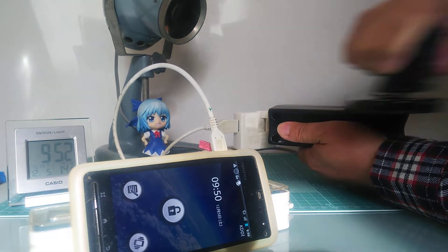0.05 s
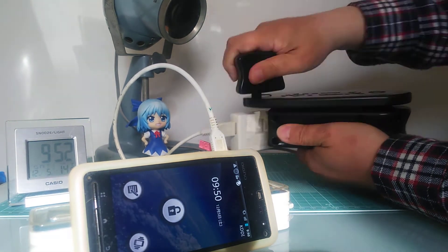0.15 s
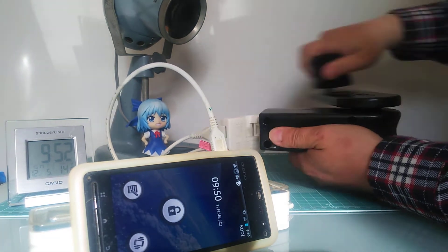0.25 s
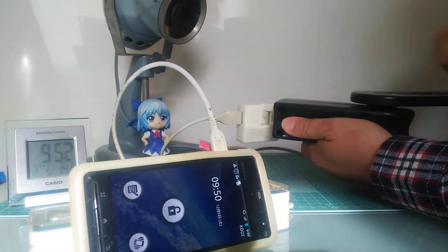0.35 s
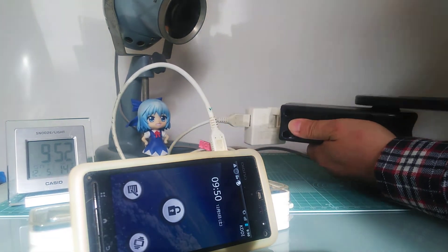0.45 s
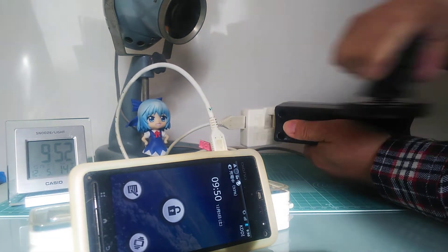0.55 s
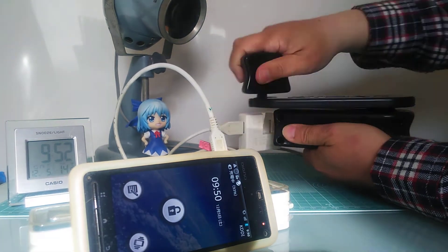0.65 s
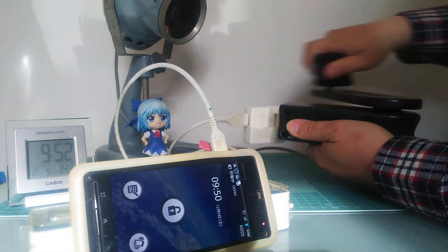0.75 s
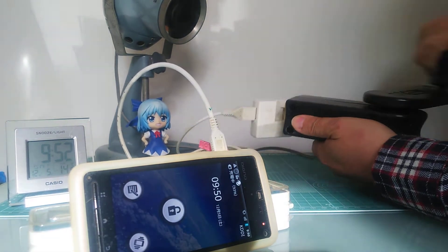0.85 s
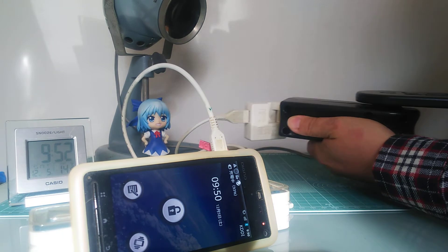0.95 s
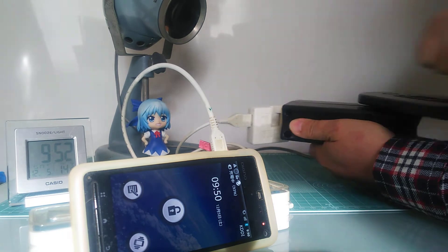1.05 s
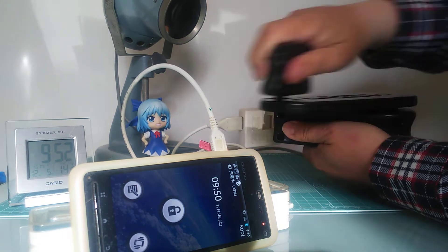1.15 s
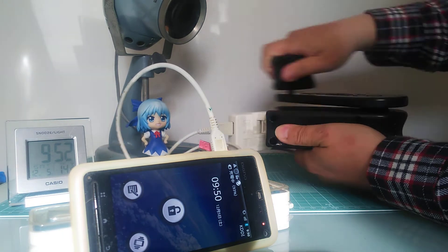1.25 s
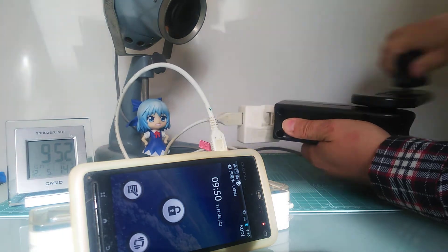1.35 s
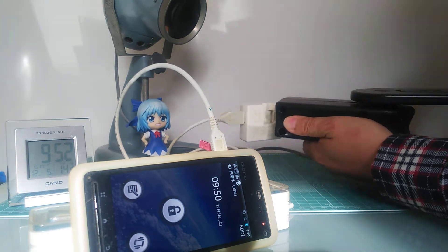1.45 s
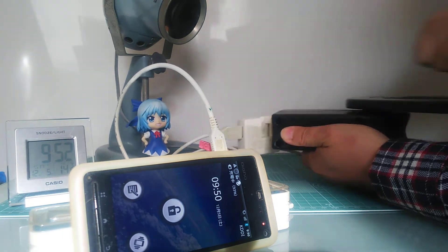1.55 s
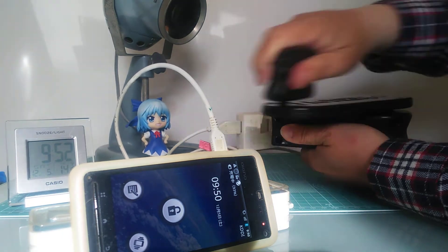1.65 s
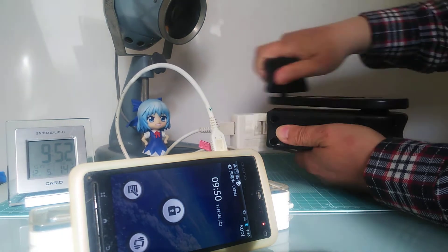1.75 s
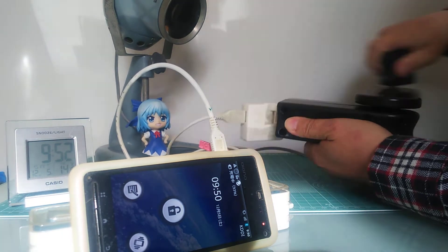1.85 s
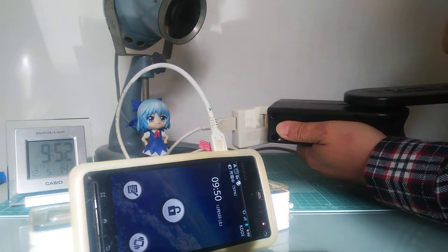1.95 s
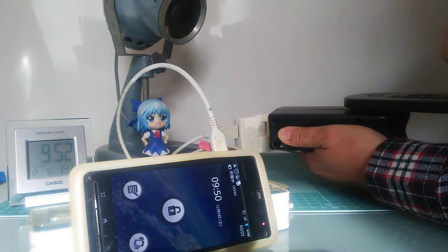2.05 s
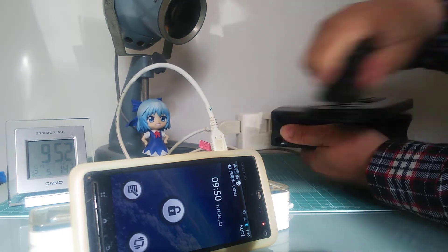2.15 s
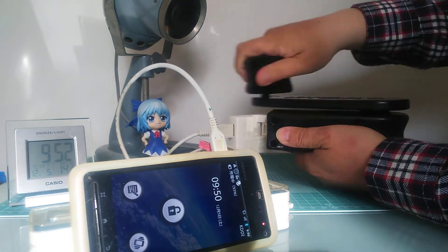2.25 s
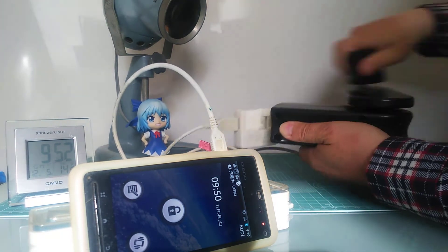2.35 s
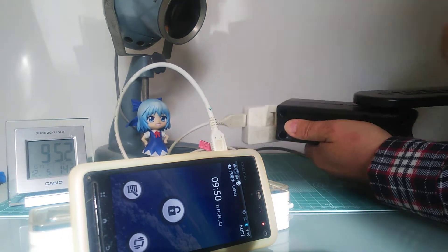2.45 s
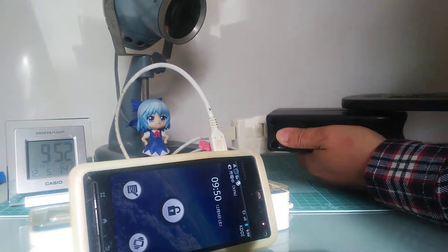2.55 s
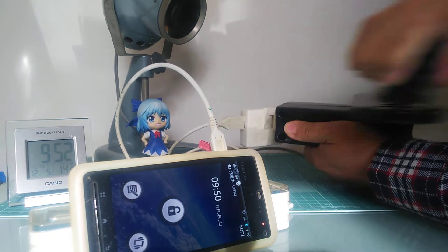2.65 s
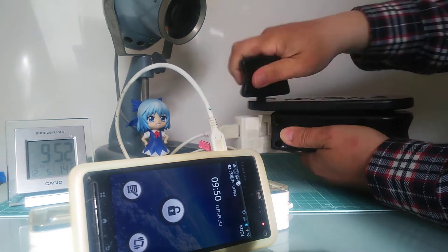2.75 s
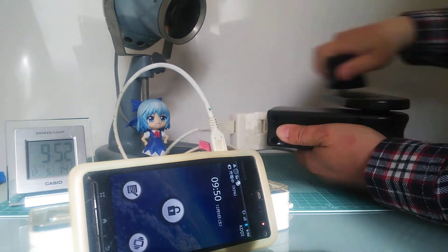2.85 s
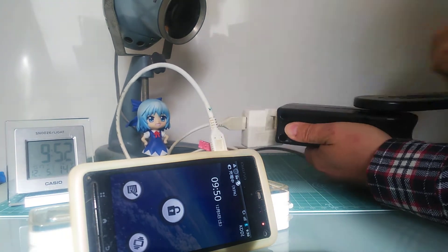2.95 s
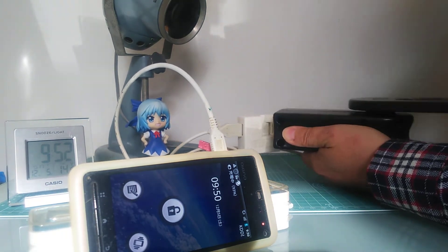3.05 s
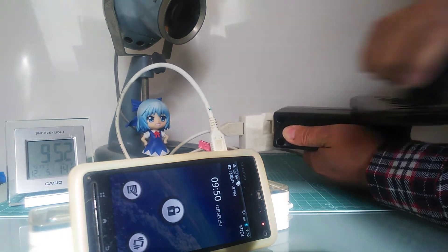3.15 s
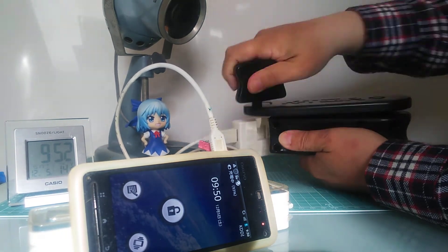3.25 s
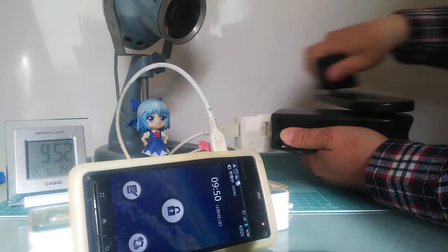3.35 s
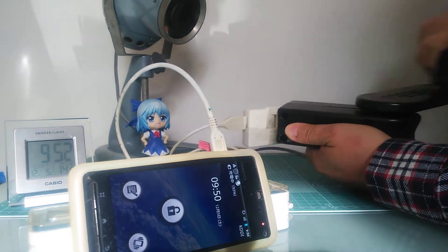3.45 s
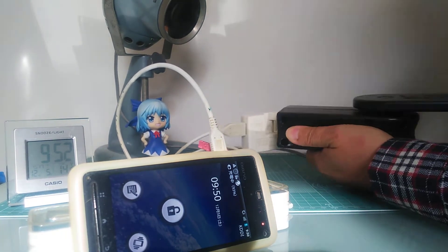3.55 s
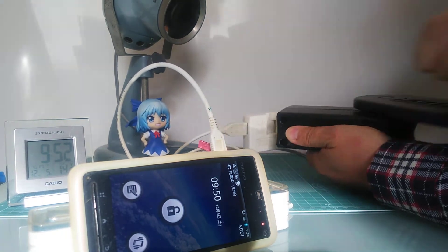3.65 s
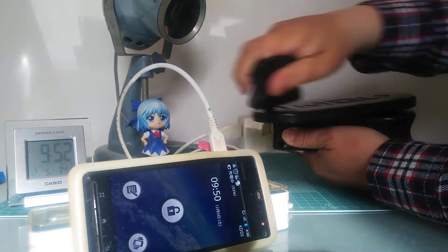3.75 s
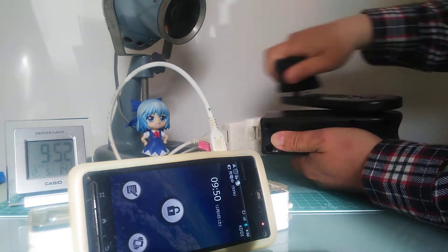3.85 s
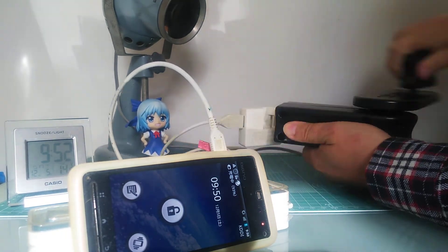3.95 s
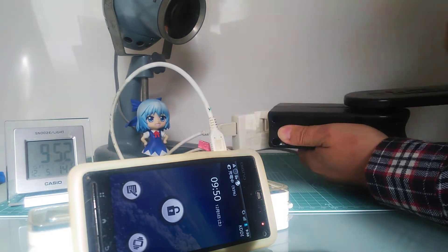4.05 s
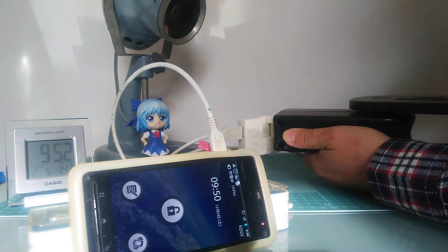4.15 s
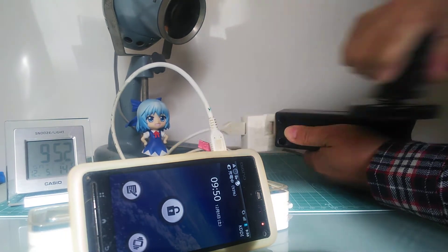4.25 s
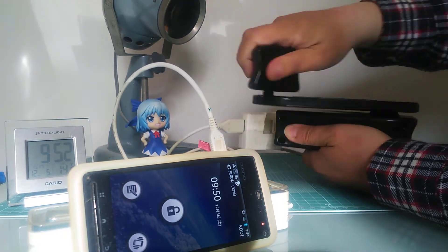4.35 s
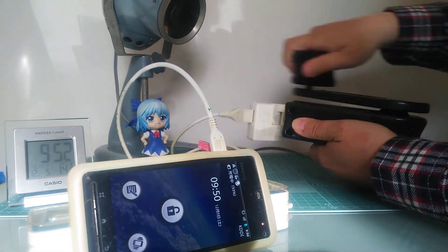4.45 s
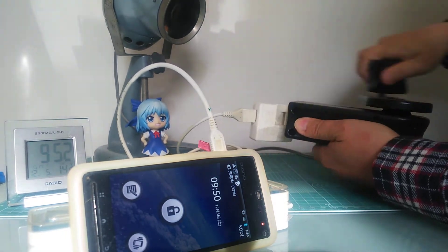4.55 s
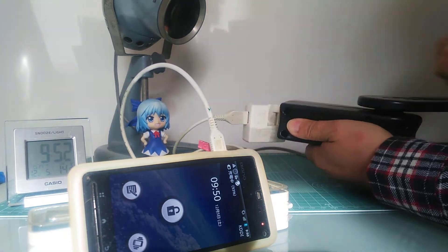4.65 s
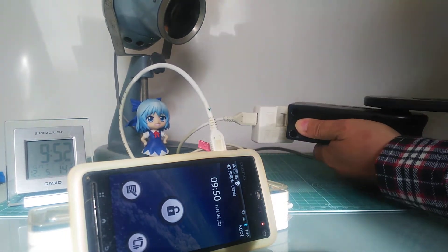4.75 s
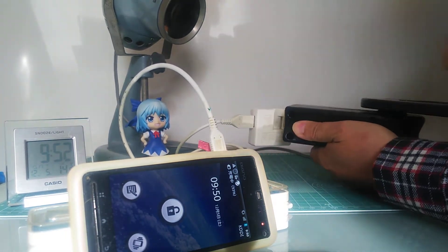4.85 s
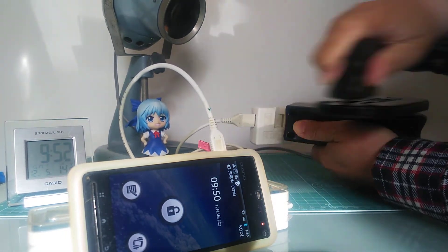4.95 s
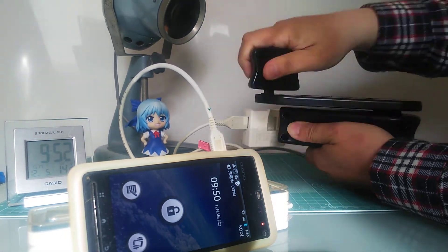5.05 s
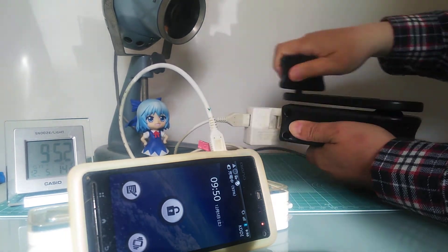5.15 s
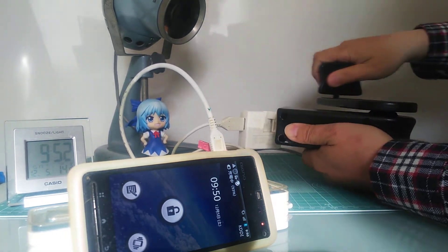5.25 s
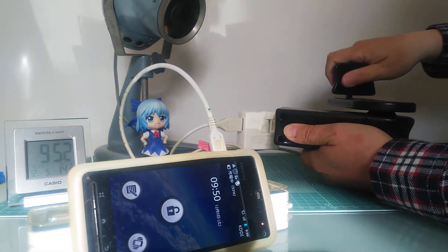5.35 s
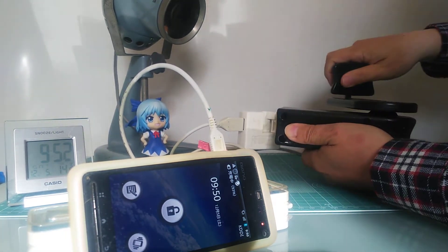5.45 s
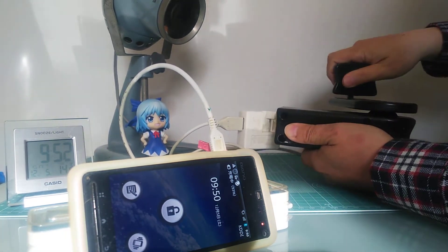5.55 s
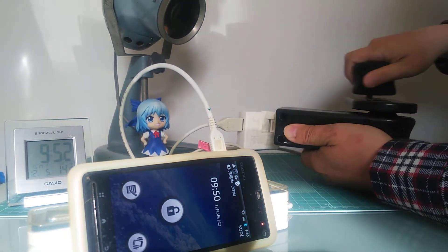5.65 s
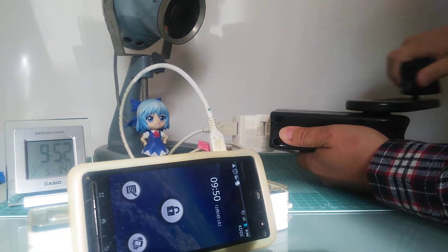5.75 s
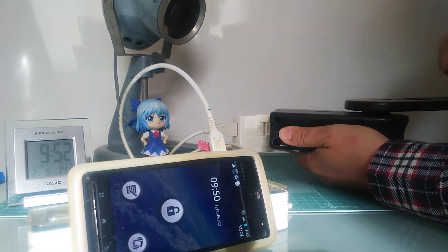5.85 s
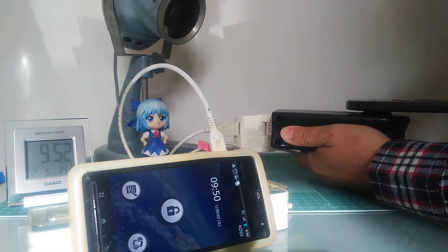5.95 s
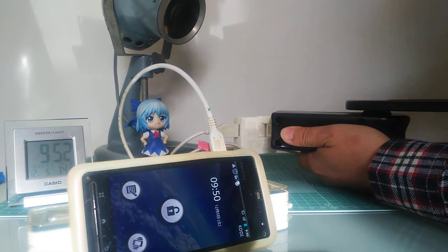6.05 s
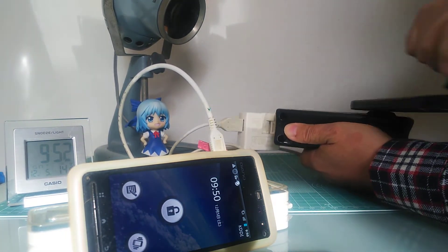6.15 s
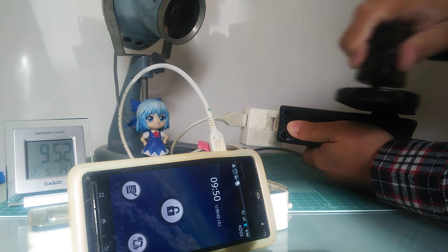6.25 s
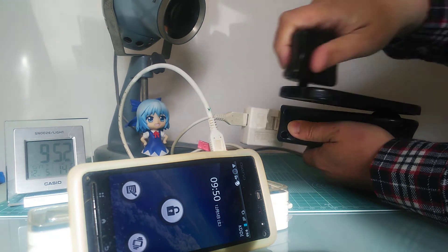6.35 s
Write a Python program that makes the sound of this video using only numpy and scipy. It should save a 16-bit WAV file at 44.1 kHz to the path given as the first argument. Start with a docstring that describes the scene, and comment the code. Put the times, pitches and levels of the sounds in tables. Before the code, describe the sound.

Geared whirring from a hand-cranked generator rises and falls with rattles and knocks, pauses briefly, then continues as a soft chatter.

```python
"""In a small room, a plastic hand-crank generator is held on a table and turned about twice a second.
Its gears whine up and down with the uneven speed of the hand. On each push the teeth knock on the case
and rattle in the gaps between them. It stops, ticks once, then runs on softly, chattering as a wheel
catches at every turn. Under it all lies the faint rumble and hiss of the room."""
import sys
import numpy as np
from scipy import signal
from scipy.fft import rfft, irfft
from scipy.io import wavfile
from scipy.ndimage import uniform_filter1d, minimum_filter1d

SR = 44100
rng = np.random.default_rng(int(sys.argv[2]) if len(sys.argv) > 2 else 0)


def transcribe(u):
    """Save the signal u as a 16-bit wav file named by the first command-line argument.

    u: samples, shape (n,) or (channels, n), limited to [-1, 1]; the rate is SR.
    q: integer samples, one column per channel.
    """
    v = np.clip(np.atleast_2d(u).T, -1, 1)
    q = np.round(v * 32767).astype(np.int16)
    wavfile.write(sys.argv[1], SR, q)


N = 282240
T = np.arange(N) / SR

# The hand's strokes. Each row: time of top speed in seconds, top shaft speed in Hz, its rise and fall
# in seconds, tooth contact in dB, rattle in dB, the rattle's delay and rise in seconds, whine in dB.
PUSHES = [(.101, 92.6, 0.099, 0.16, -25.5, -16.5, 0.03, 0.057, -44.5),
          (.606, 78.87, 0.11, 0.13, -26.5, -19, 0.061, 0.058, -47.5),
          (1.171, 88.4, 0.14, 0.12, -25, -17.5, 0.03, 0.053, -44),
          (1.628, 86.37, 0.079, 0.18, -24, -19, 0.087, .073, -45.5),
          (2.176, 88.87, 0.11, 0.17, -27.5, -17, 0.068, 0.073, -45.5),
          (2.712, 91.2, 0.11, 0.133, -25, -18, 0.038, 0.048, -45),
          (3.203, 95.84, .087, .121, -24.5, -15.5, 0.019, 0.024, -45),
          (3.755, 96.48, 0.096, 0.095, -26, -15.5, 0.0037, 0.032, -45),
          (4.315, 67.82, 0.15, 0.12, -26.5, -21.5, 0.054, 0.093, -43.5),
          (4.954, 60.1, 0.097, 0.12, -26, -20.5, 0.089, 0.034, -45)]  # the strong half of a turn
PULLS = [(.373, 72, 0.082, 0.045, -29, -22.5, 0.0034, 0.068, -49),
         (.915, 71.43, 0.097, 0.047, -27.5, -25.5, 0.011, 0.027, -48),
         (1.432, 67.57, 0.091, 0.051, -28, -25, 0.014, 0.069, -48.5),
         (1.946, 62.47, 0.067, 0.047, -30.5, -22.5, .044, 0.036, -46),
         (2.48, 58.04, .064, 0.056, -29.5, -21.5, 0.045, 0.033, -46.5),
         (2.996, 63.57, 0.07, 0.056, -30, -24, 0.036, 0.094, -50.5),
         (3.504, 63.93, .078, .068, -27, -27.5, 0.033, 0.15, -47.5),
         (4.0, 57.3, 0.11, 0.095, -29.5, -29, 0.065, .1, -48),
         (4.656, 52.4, 0.077, 0.081, -29.5, -28.5, 0.09, 0.089, -48)]  # the weaker way back
# The teeth go slack between strokes. Each row: time in seconds, level change in dB.
SLACKS = [(0.254, -1), (.45, -1), (0.979, -3), (1.51, -2), (2.03, 0), (3.07, -2), (3.299, -3.5), (3.58, -2),
          (4.125, -2), (4.795, -4)]
# Gear tones. Each row: multiple of the shaft speed, relative level in dB.
GEAR_TONES = [(5.2, -5), (12, 0), (16.2, -3), (17, -4), (24, -2), (29.8, -6), (36, -1), (40.3, -6),
              (48, -5), (53.4, -1), (64.9, -4), (71.3, -3), (83, -3)]
STRAIN_TONES = [(10.3, -7), (20.3, -7), (32.5, -3), (47.3, -5)]  # added by uneven teeth while the shaft speeds up
# One tone sings out under an even hand.
# Each row: time in seconds, half length in seconds, the tone's multiple, boost in dB.
SINGS = [(.11, .06, 12, 3), (.52, .04, 24, 4), (.58, .03, 5.2, 6), (.79, .06, 24, 4), (1.35, .05, 24, 4),
         (1.855, .06, 24, 4), (2.17, .08, 24, 4), (2.18, .07, 12, 3), (2.42, .11, 24, 4),
         (2.705, .036, 5.2, 11.5), (2.91, .05, 24, 3), (3.21, .05, 24, 4), (3.45, .035, 24, 2),
         (4.01, .035, 24, 5), (4.235, .05, 24, 3), (4.655, .05, 24, 3), (4.962, .06, 24, 9)]
# Short hits. Each row: start in seconds, level in dB.
KNOCKS = [(.157, -13), (.175, -14), (.933, -24), (.96, -27), (1.159, -15), (1.172, -14), (1.448, -20),
          (1.648, -9), (1.699, -16), (1.716, -15), (2.192, -14), (2.224, -14), (2.239, -12), (2.744, -13),
          (2.850, -16), (3.207, -14), (3.221, -14), (3.769, -15), (3.782, -14), (3.793, -15), (3.884, -24),
          (4.166, -24.5), (4.376, -19), (4.399, -21), (4.826, -30), (5.041, -22), (5.127, -21),
          (5.161, -26), (5.2, -29)]  # teeth knock hard
CLICKS = [(.284, -24), (1.257, -39), (1.648, -28), (2.01, -42), (2.728, -33), (2.745, -28), (2.827, -36),
          (3.886, -32), (3.905, -30), (4.702, -43)]  # sharp and bright: small snaps, and the microphone overloading on hard knocks
CATCHES = [(5.662, -44), (5.708, -36), (5.746, -35), (5.788, -34.5), (5.83, -33.5), (5.868, -33.5),
           (5.905, -31), (5.946, -34), (5.991, -35), (6.04, -34), (6.088, -36), (6.129, -40),
           (6.173, -32.5), (6.216, -34), (6.262, -32.5), (6.307, -34.5), (6.349, -33)]  # a wheel catches in light running
# Dry teeth squeak. Each row: time in seconds, pitch in Hz, half length in seconds, level in dB.
SQUEAKS = [(2.25, 3480, .018, -23), (2.862, 3140, .022, -24), (3.34, 3080, .014, -25),
           (3.37, 3350, .016, -26), (5.06, 3500, .018, -27)]
# The handle groans. Each row: pitch in Hz, waver as a share of the pitch, level in dB.
GROAN_TONES = [(425, .028, -43), (510, .06, -49), (715, .06, -46)]
# The case presses on the table. Each row: time in seconds, half length in seconds, level in dB.
BUMPS = [(3.104, 0.052, -58), (3.315, 0.045, -66), (4.398, 0.026, -60)]

# Pitches at which parts ring. Each row: frequency in Hz, width in Hz, boost in dB.
CASE_RINGS = [(462, 107, 1), (1045, 112, 9.5), (1382, 370, 6), (1577, 150, -6.5), (1818, 407, 10),
              (2208, 55, 4.5), (2600, 73, -3), (2677, 37, 3.5), (3160, 53, 0), (3630, 119, 0),
              (3690, 71, 4.5), (4500, 310, 0.5), (4878, 104, 9)]
WHEEL_RINGS = [(1050, 100, -3), (1430, 160, -3), (2560, 80, 4), (2720, 130, 9), (2890, 100, -9),
               (3090, 90, 3)]  # only while the wheels run without load
# Tone curves, from bass to treble. Each row: frequency in Hz, gain in dB.
CONTACT_CURVE = [(60, -20), (200, -22), (400, -15), (650, -12), (900, -7), (1200, -6.5), (1900, -2.5),
                 (2400, -2.5), (3200, -6), (4500, -6), (7000, -16), (11000, -30), (12500, -48.5)]
RATTLE_CURVE = [(200, -27), (700, -37.5), (1100, 0.5), (1900, -35.5), (2600, 8), (3300, 6.5), (4400, -3),
                (5500, -4), (7000, -20), (9000, -31.5), (11200, -25.5), (12500, -47)]
CLASH_CURVE = [(2000, -29), (4000, 4.5), (5000, 2), (6500, -5), (8500, -7), (11000, -30), (13000, -54.5)]
WHINE_CURVE = [(280, -16), (460, -9.5), (600, -11.5), (800, -7.5), (950, -7), (1170, -4), (1280, 2.5),
               (1430, 3.5), (1560, 3.5), (1850, 1), (2100, 3.5), (2400, 3), (2700, -2), (3300, 1),
               (3800, -2), (4400, -7), (6000, -18)]  # how well the case gives off the gear tones
TABLE_CURVE = [(70, -15.5), (105, -1.5), (125, -2), (150, -28.5)]  # the table booms under the magnet hum
COAST_CURVE = [(150, -28), (400, -15.5), (650, -15.5), (780, -6.5), (1080, 1), (1500, -5.5), (2000, -4),
               (2560, 3.5), (3000, 2.5), (4000, -7.5), (4850, -13), (5500, -14), (7500, -26), (11000, -36),
               (13000, -49)]
KNOCK_CURVE = [(200, -38), (700, -28), (1100, -11), (2000, -12), (2900, -3), (3550, 4), (4100, -3),
               (5200, -6), (7000, -19), (11000, -35), (14000, -58)]
CLICK_CURVE = [(300, -35), (1000, -25), (3000, 0), (5000, -2), (8500, -2), (11500, -16), (14000, -36)]
TICK_CURVE = [(200, -8.5), (900, -3), (2000, 1.5), (3800, -9), (4800, -21), (9000, -36)]
ROOM_CURVE = [(15, -60), (25, 0.5), (70, 8.5), (308, -6), (455, -1), (545, -3.5), (869, -10), (3910, -12),
              (10700, -22.5), (12200, -22), (15900, -60), (22000, -120)]
RIGHT_MIC_CURVE = [(300, 0), (600, -1), (900, 3.5), (1400, 1.5), (1800, 1), (2200, 6), (2700, 3.5),
                   (3150, 10.5), (3500, 11), (3850, 12.5), (4300, 2), (6200, -4), (7400, -14.5),
                   (12500, -33.5)]  # its small opening rings and dulls the top

IDLE_HZ = 41  # shaft speed that the strokes add to
STOP_S, RUN_DOWN_S, STOP_DB_PER_S = 5.235, 0.099, 320  # the hand lets go
COAST_S, COAST_RISE_S, COAST_DB, COAST_FADE_DB_PER_S = 5.61, .12, -37, 9  # light running follows
CLASH_DB, FULL_RATTLE_DB = -32, -18  # clash level at full rattle, and that rattle level
FULL_PUSH_HZ_PER_S, PUSH_BOOST_DB = 250, 6  # speeding up this fast lifts the whine this much
PING_DB = -.5  # compared with the rattling blows


def cranking():
    """Shaft speed sets the gears' pitch and rate; each stroke sets how loud they rub, rattle and whine."""
    pushes = strokes(PUSHES, contact=(.06, .053, .15), whine=(.02, .08, .07), rattle_fall_share=.85)
    pulls = strokes(PULLS, contact=(.03, .081, .095), whine=(.05, .1, .055), rattle_fall_share=.17)
    added_hz, *powers = pushes + pulls
    contact_gain, rattle_gain, whine_gain = np.sqrt(powers)
    stopped_s = np.maximum(T - STOP_S, 0)
    speed_hz = (IDLE_HZ + added_hz) * np.exp(-stopped_s / RUN_DOWN_S)
    turns = np.cumsum(speed_hz) / SR
    taps = teeth(turns, per_turn=24, slop=.3, scatter_db=5.5, wobble_db=3.5, table_db=2, room_db=-3)
    contact = unit(colour(taps, CONTACT_CURVE, CASE_RINGS))
    blows = teeth(turns, per_turn=12, slop=.3, scatter_db=3.5, wobble_db=4.5, table_db=4, room_db=-7)
    rattle = unit(colour(blows, RATTLE_CURVE, CASE_RINGS)) + pings(turns, speed_hz)
    rattle /= np.hypot(1, undb(PING_DB))
    # The hardest blows add a bright clash.
    clash = unit(colour(blows, CLASH_CURVE)) * undb(CLASH_DB) * (rattle_gain / undb(FULL_RATTLE_DB)) ** 2
    hum = magnet_hum(turns, speed_hz)
    slack = undb(sum(db * swell(s, .034, .034, 5.9) for s, db in SLACKS))
    whine = gear_whine(turns, speed_hz) * slack  # the whine dips twice as deep as the rest
    gears = contact * contact_gain + rattle * rattle_gain + clash + whine * whine_gain
    return (gears + hum) * slack * undb(-STOP_DB_PER_S * stopped_s)


def strokes(rows, contact, whine, rattle_fall_share, roundness=.94):
    """The hand adds speed and power. Contact and whine peak before top speed, the rattle after it."""
    contact_lead_s, *contact_rise_fall_s = contact
    whine_lead_s, *whine_rise_fall_s = whine
    added_hz, contact_power, rattle_power, whine_power = np.zeros((4, N))
    for s, top_hz, rise_s, fall_s, contact_db, rattle_db, delay_s, rattle_rise_s, whine_db in rows:
        added_hz += (top_hz - IDLE_HZ) * swell(s, rise_s, fall_s, 2)
        contact_power += undb(contact_db) ** 2 * swell(s - contact_lead_s, *contact_rise_fall_s, roundness)
        rattle_fall_s = rattle_rise_s * rattle_fall_share
        rattle_power += undb(rattle_db) ** 2 * swell(s + delay_s, rattle_rise_s, rattle_fall_s, roundness)
        whine_power += undb(whine_db) ** 2 * swell(s - whine_lead_s, *whine_rise_fall_s, roundness)
    return np.array([added_hz, contact_power, rattle_power, whine_power])


def teeth(turns, per_turn, slop, scatter_db, wobble_db, table_db, room_db, spots=5):
    """Each tooth lands one uneven blow on the case; off-centre wheels make the force come in waves."""
    timing, strength, direction = rng.standard_normal((12000, 3)).T
    tooth_turns = (np.arange(len(timing)) + slop * timing) / per_turn
    times = np.interp(tooth_turns, turns, T, right=N)
    shaft_angle = 2 * np.pi * tooth_turns
    wheel_angle = shaft_angle * 3 / 8
    wobble = .11 * np.cos(wheel_angle) + .39 * np.cos(2 * wheel_angle) + .93 * np.cos(shaft_angle)
    force = undb(scatter_db * np.clip(strength, -2, 2) + wobble_db * wobble) * np.sign(direction)
    hits = (case_spot(impulses(times[k::spots], force[k::spots])) for k in range(spots))
    return sum(microphones(hit, table_db, room_db) for hit in hits)


def case_spot(x):
    """Each spot that a tooth lands on rings at four high pitches of its own."""
    rings = [(hz, 70, 5) for hz in rng.uniform(3000, 4000, size=4)]
    return colour(x, [(20, 0), (20000, 0)], rings)


def pings(turns, speed_hz, count=360, rise_s=.003, decay_s=.013, range_hz=(3000, 3750), scatter_db=12):
    """Glancing blows ring a wheel at a multiple of the shaft speed, so each ping slides with it."""
    age = T[:SR // 12]
    shape = (1 - np.exp(-age / rise_s)) * np.exp(-age / decay_s)
    out = np.zeros(N)
    for i, (when, pitch, softness) in enumerate(rng.random((count, 3))):
        start = int((i + when) / count * (N - len(age)))
        span = slice(start, start + len(age))
        multiple = np.round(np.interp(pitch, [0, 1], range_hz) / np.average(speed_hz[span], weights=shape))
        out[span] += undb(-scatter_db * softness) * shape * np.sin(2 * np.pi * multiple * turns[span])
    return unit(microphones(out, table_db=-3, room_db=-9)) * undb(PING_DB)


def gear_whine(turns, speed_hz):
    """Gear tones follow the shaft, flutter with flaws in the teeth and flare where the case rings."""
    push = np.clip(np.gradient(speed_hz) * SR / FULL_PUSH_HZ_PER_S, 0, 1)
    shaky_turns = turns + .002 * drift(60)

    def tone(multiple, db):
        sing_db = sum(boost * swell(s, half_s, half_s, 4) for s, half_s, k, boost in SINGS if k == multiple)
        gain = undb(db + sing_db + 2.2 * drift(50))
        return gain * np.sin(2 * np.pi * (multiple * shaky_turns + rng.random()))

    tones = sum(tone(*row) for row in GEAR_TONES)
    strain = sum(tone(*row) for row in STRAIN_TONES)
    throb = 1 + .5 * np.cos(2 * np.pi * turns + drift(20))  # an off-centre wheel, once a turn
    whine = np.sqrt(2) * throb * (tones + push * strain) * undb(PUSH_BOOST_DB * push)
    return microphones(colour(whine, WHINE_CURVE, CASE_RINGS), table_db=-6, room_db=-14)


def magnet_hum(turns, speed_hz):
    """The magnets tug twice a turn, harder at speed, and the table booms along."""
    tug = np.sin(4 * np.pi * turns) * speed_hz / IDLE_HZ
    return colour(tug * undb(-61 + 3.8 * drift(14)), TABLE_CURVE)


def coasting(shaft_hz=60, swell_db=3, swell_peak_s=6.7, swell_every_s=.44):
    """Unloaded teeth brush past each other, swelling with the gentle hand, and one wheel keeps catching."""
    age = np.maximum(T - COAST_S, 0)
    level = np.minimum(age / COAST_RISE_S, 1) * undb(COAST_DB - COAST_FADE_DB_PER_S * age)
    taps = teeth(T * shaft_hz, per_turn=24, slop=.4, scatter_db=0, wobble_db=-2, table_db=-8, room_db=-8.5)
    brush = unit(colour(taps, COAST_CURVE, CASE_RINGS + WHEEL_RINGS))
    softer_rings = [(hz, width, db / 2) for hz, width, db in WHEEL_RINGS]
    catches = bursts(CATCHES, COAST_CURVE, CASE_RINGS + softer_rings, rise_s=.003, decay_s=.0105)
    hand = undb(swell_db * np.cos(2 * np.pi * (T - swell_peak_s) / swell_every_s))
    return brush * level * hand + catches


def knocks():
    """Hard tooth knocks, sharp bright clicks, and a dull tick as the handle settles at rest."""
    hard = bursts(KNOCKS, KNOCK_CURVE, CASE_RINGS, rise_s=.0006, decay_s=.0024)
    clicks = bursts(CLICKS, CLICK_CURVE, rise_s=.00036, decay_s=.007)
    tick = bursts([(5.497, -48.5)], TICK_CURVE, CASE_RINGS, rise_s=.00059, decay_s=.014)
    return hard + clicks + tick


def bursts(rows, curve, rings=(), *, rise_s, decay_s):
    """Each hit is a puff of gritty noise that rises fast and dies away."""
    age = T[:SR // 2]
    shape = (1 - np.exp(-age / rise_s)) * np.exp(-age / decay_s)
    starts, db = np.transpose(rows)
    noise = microphones(rng.standard_normal(N), table_db=8, room_db=-37.5)
    grit = unit(colour(noise, curve, rings))
    return convolve(impulses(starts, undb(db)), shape / shape.max()) * grit


def squeaks():
    """A slipping tooth rings its wheel for a moment, with an unsteady pitch."""
    out = 0
    for s, hz, half_s, db in SQUEAKS:
        ring = microphones(wavering_tone(hz, waver=.0091, rate=250), table_db=-3, room_db=-7)
        out += unit(ring) * undb(db) * swell(s, half_s, half_s, 2)
    return out


def handling():
    """The handle sticks and groans briefly; the hands press rumble and dull bumps into the table."""
    groan = sum(undb(db) * unit(wavering_tone(hz, waver, rate=120)) for hz, waver, db in GROAN_TONES)
    groan *= swell(3.92, rise_s=.045, fall_s=.025, roundness=1.7)
    low_band = signal.butter(2, [42, 85], "band", fs=SR, output="sos")
    rumble = unit(signal.sosfilt(low_band, rng.standard_normal(N)))
    bumps = sum(undb(db) * swell(s, half_s, half_s, 2) for s, half_s, db in BUMPS)
    hold = undb(-62.5) * (T < 5.3)
    return groan + rumble * (bumps + hold)


def room_tone():
    """Faint indoor rumble and a little hiss, partly the same on the left and right."""
    noise = rng.standard_normal(N) + 2.2 * rng.standard_normal((2, N))
    return unit(colour(noise, ROOM_CURVE)) * undb(-61)


def microphones(x, table_db, room_db, left_delay_samples=5):
    """Sound reaches the right microphone first; the table scatters the treble and the room rings on."""
    x = np.atleast_2d(x)[0]
    direct = np.array([np.pad(x, (left_delay_samples, 0))[:N], x])
    treble = signal.sosfilt(signal.butter(2, 2200, "high", fs=SR, output="sos"), x)
    table = undb(table_db) * convolve(treble, echoes(fade_s=.077))
    room = undb(room_db) * convolve(x, echoes(fade_s=.28))
    left, right = direct + table + room
    return np.array([left, colour(right, RIGHT_MIC_CURVE)[0]])


def echoes(fade_s, size=16384):
    """Dense echoes, different on each side, that fall by 60 dB in fade_s."""
    tail = rng.standard_normal((2, size)) * undb(-60 * T[:size] / fade_s)
    return tail / np.sqrt(np.sum(tail ** 2, axis=1, keepdims=True))


def colour(x, curve, rings=(), size=8192):
    """Shape a sound with a tone curve, plus a peak or dip for each ring."""
    freqs = np.maximum(np.arange(size // 2 + 1) * SR / size, 1)
    hz, db = np.transpose(curve)
    db = np.interp(np.log(freqs), np.log(hz), db)
    for centre, width, boost in rings:
        db = db + boost / (1 + (2 * (freqs - centre) / width) ** 2)
    # These steps make the filter ring after a hit, never before it.
    cepstrum = irfft(np.log(undb(db)))
    cepstrum[1:size // 2] *= 2
    cepstrum[size // 2 + 1:] = 0
    return convolve(x, irfft(np.exp(rfft(cepstrum))))


def convolve(x, response):
    """Pass a sound through one response per channel."""
    return signal.fftconvolve(np.atleast_2d(x), np.atleast_2d(response), axes=1)[:, :N]


def impulses(times, sizes):
    """Single clicks at the given times."""
    return np.bincount(np.clip(np.asarray(times) * SR, 0, N).astype(int), sizes, N + 1)[:N]


def swell(s, rise_s, fall_s, roundness):
    """A hump of height 1 at time s. Roundness 1 is pointed, 2 is a bell."""
    return np.exp(-np.abs((T - s) / np.where(T < s, rise_s, fall_s)) ** roundness)


def wavering_tone(hz, waver, rate):
    """A pure tone whose pitch wanders."""
    return np.sin(2 * np.pi * np.cumsum(hz * (1 + waver * drift(rate))) / SR)


def drift(rate):
    """A random wander of typical size 1 that turns rate times a second."""
    wander = np.interp(T * rate, np.arange(8192), rng.standard_normal(8192))
    return wander / wander.std()


def unit(x):
    """Scale a sound so that the average of its channels has strength (rms) 1."""
    return x / np.sqrt(np.mean(np.atleast_2d(x).mean(axis=0) ** 2))


def undb(db):
    """Decibels to gain."""
    return 10 ** (np.asarray(db) / 20)


def scene():
    """The generator, the hands and the room."""
    return cranking() + coasting() + knocks() + squeaks() + handling() + room_tone()


def record(dry, top_hz=14200):
    """The loudest peaks are turned down and the highest treble is cut."""
    allowed = 1 / np.maximum(np.abs(dry).max(axis=0), 1)
    gain = uniform_filter1d(minimum_filter1d(allowed, size=129), size=129)
    return signal.sosfiltfilt(signal.ellip(8, .1, 60, top_hz, fs=SR, output="sos"), dry * gain)


dry = scene()
out = record(dry)
transcribe(out)
```